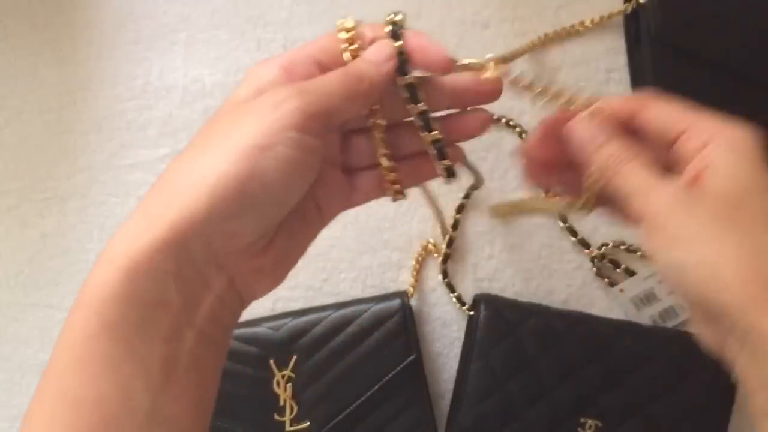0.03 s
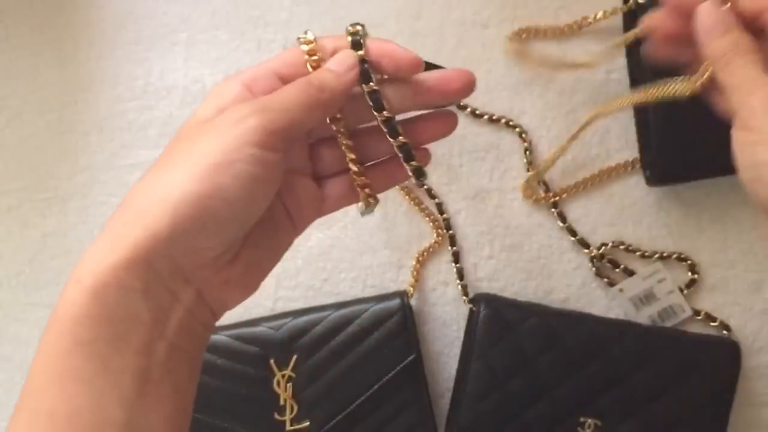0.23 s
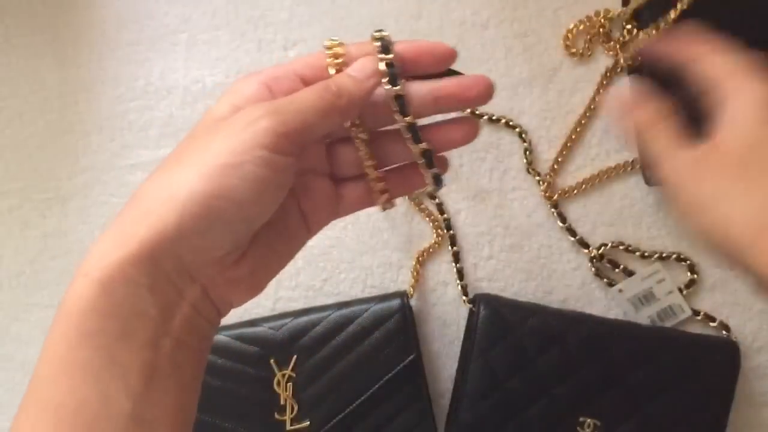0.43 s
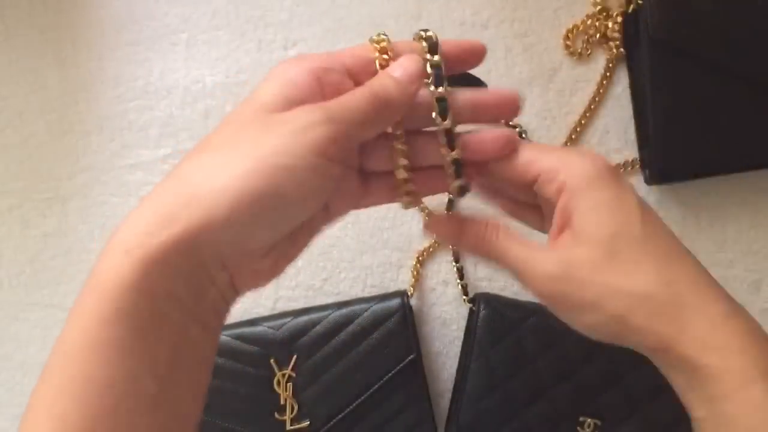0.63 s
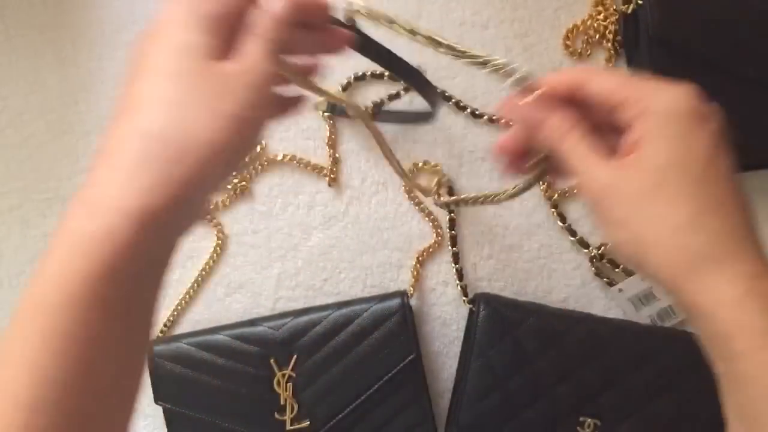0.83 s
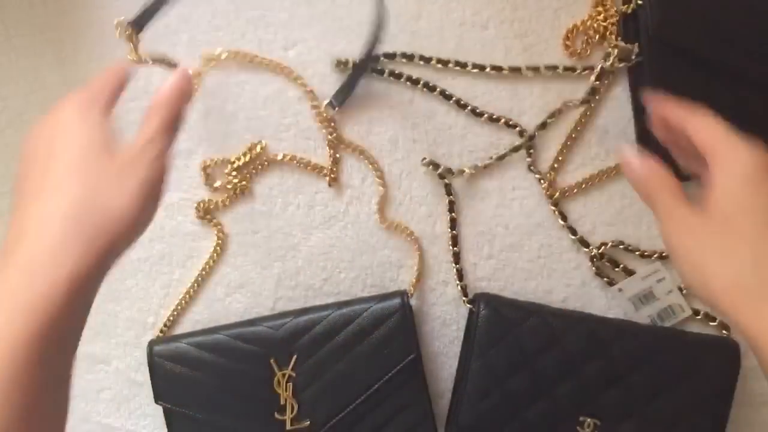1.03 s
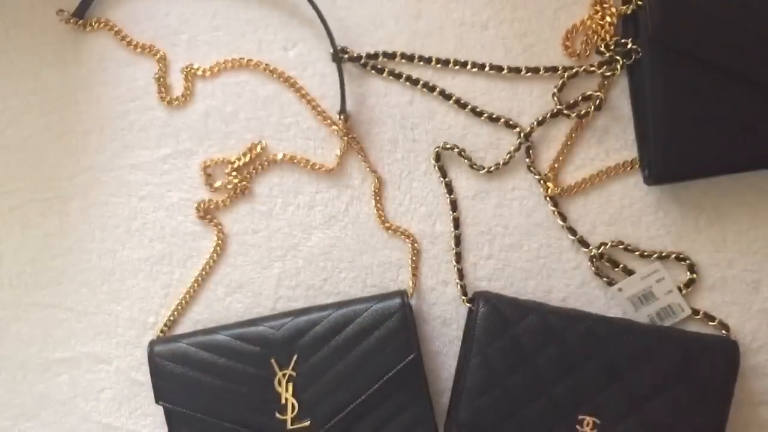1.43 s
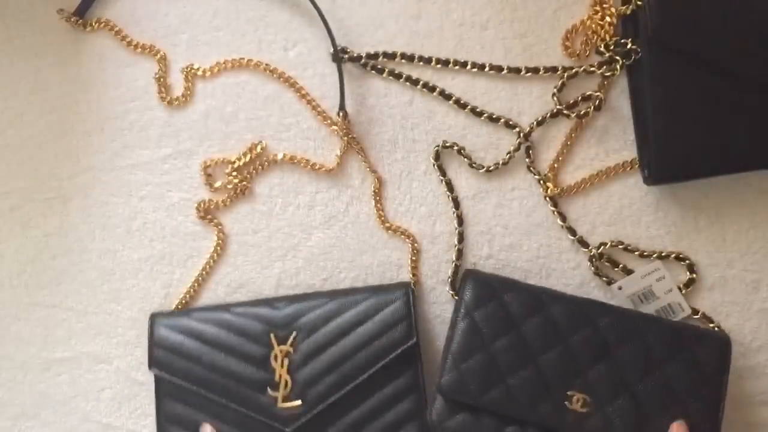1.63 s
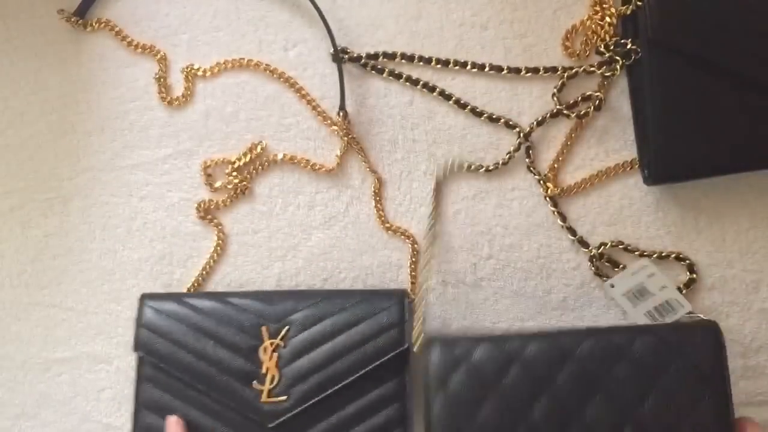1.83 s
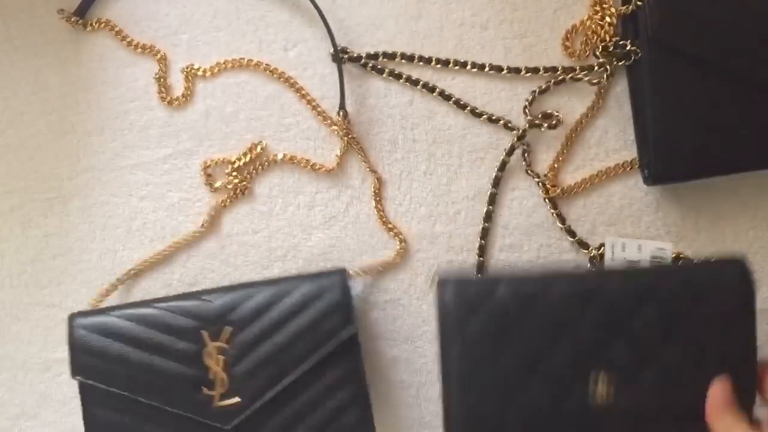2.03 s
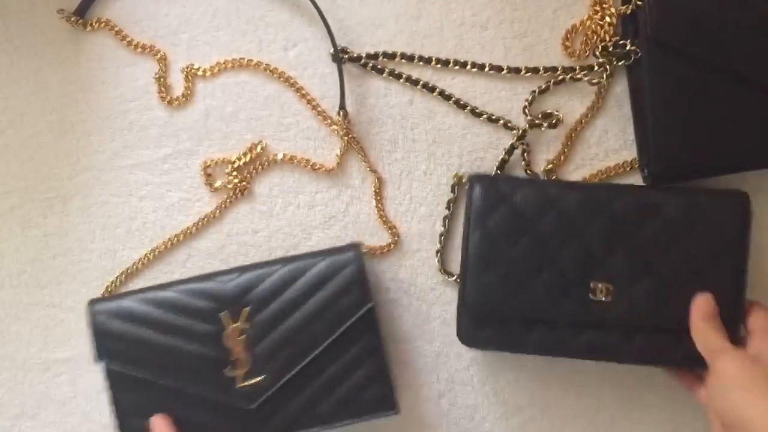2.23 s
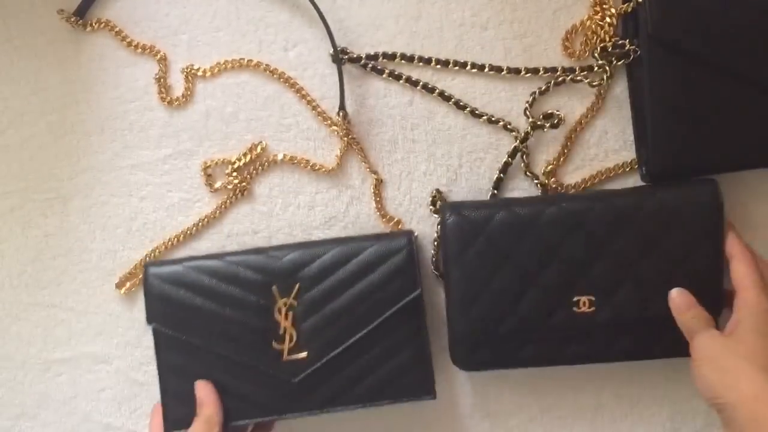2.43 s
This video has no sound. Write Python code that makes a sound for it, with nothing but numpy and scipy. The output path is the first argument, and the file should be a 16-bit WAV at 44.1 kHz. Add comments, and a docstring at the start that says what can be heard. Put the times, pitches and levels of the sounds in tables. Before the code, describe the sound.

Handbag chains jingling and rattling down, followed by soft taps of bags being moved.

```python
"""Handbag chains on a table

In a small, quiet room a chain strap jingles as its colliding links ring, clatters onto a stiff leather bag and
settles. Other straps drop on the cloth-covered table: a chain threaded with leather ticks drily without
ringing, and the padded top thuds. Two bags are shifted: hollow taps, clicking clasps, the stick-slip scrape and
creak of leather, and one more jingle."""
import sys
import numpy as np
from scipy import signal
from scipy.fft import rfft, irfft
from scipy.io import wavfile
from scipy.ndimage import map_coordinates

SR = 44100
rng = np.random.default_rng(int(sys.argv[2]) if len(sys.argv) > 2 else 0)


def dump(signal):
    """Clip the signal to [-1, 1] and save it as 16-bit WAV at the path in sys.argv[1]."""
    limited = np.clip(np.atleast_2d(signal).T, -1, 1)
    pcm = np.round(limited * 32767).astype(np.int16)
    wavfile.write(sys.argv[1], SR, pcm)


N = 114660
THUD_SAG = 0.12  # share of its pitch a thud or tap loses as the weight settles


def jingle(count=20):
    """Modal ringing: links collide in clumps and flurries, each sounding its own pair of modes."""
    # One list for each shake of the chain. Each row: time in seconds, level of motion in dB.
    shakes = [
        [(0.0, -67), (0.03, -81)],
        [(0.138, -83), (0.152, -60), (0.205, -48.5), (0.28, -57), (0.338, -71), (0.376, -55.5), (0.392, -42.5),
         (0.515, -41), (0.555, -52.5), (0.592, -62), (0.635, -46), (0.685, -50.5), (0.718, -59), (0.795, -42.5),
         (0.815, -56), (0.885, -70)],
        [(2.315, -63), (2.33, -46), (2.365, -63.5), (2.44, -80)],
    ]
    # The swinging chain flicks against itself. Each row: start in seconds, level of motion in dB.
    flicks = [(0.232, -40.5), (.306, -55.5), (.45, -41), (.478, -30.5), (0.512, -29), (.615, -42.5),
              (.739, -46), (.772, -42), (.788, -36.5)]
    # Modes of one link. Each row: frequency in Hz, gain in dB, decay time T60 in seconds.
    link_modes = [(8314, -7.5, 0.054), (10864, -5, 0.043)]
    # Spectrum of link striking link. Each row: frequency in Hz, gain in dB.
    contact_spectrum = [(300, -57), (2500, -20.5), (5000, -11), (7000, -23.5), (8400, 1.5), (10000, -4),
                        (11400, 1), (15000, 0)]
    clumps_per_s, clump_db, pitch_scatter = 160, 1.5, 0.0092
    reference = amp(-54.5)  # typical strength of motion
    time = since(0)
    shaking = [amp(np.interp(time, *np.transpose(shake), left=-120, right=-120)) for shake in shakes]
    clumps = amp(clump_db * map_coordinates(rng.standard_normal(N), [time * clumps_per_s]))
    flurries = strokes([(s, 0.0022, db) for s, db in flicks], attack_s=0.0011, release_s=0.046)
    motion = np.hypot(np.max(shaking, axis=0) * clumps, flurries) / reference
    ring_drive = reference * motion ** 0.92
    tick_drive = amp(-3.5) * reference * motion ** 0.89
    ticks = through(contacts(rate=2400, spread_db=-0.5), body(contact_spectrum))
    ticks += amp(-2.5) * pings(1, contact_spectrum, rate=45)
    out = tick_drive * ticks
    for detune in np.linspace(-1, 1, count):
        hits = ring_drive * contacts(rate=49, spread_db=0) / np.sqrt(count)
        for hz, db, t60 in link_modes:
            pitch = hz * (1 + pitch_scatter * (detune + 0.5 * rng.standard_normal()))
            out += amp(db) * resonate(hits, pitch, t60, samples=SR // 4)
    return out


def rattle():
    """Contact damping: leather threaded through the links cuts their ring to dry ticks, with snaps where the
    chain lands."""
    # Straps slide and pile up. Each row: start in seconds, length in seconds, level in dB.
    slides = [(.874, 0.015, -58.5), (.935, 0.019, -68), (1.037, 0.05, -53.5), (1.126, 0.017, -45),
              (1.155, 0.032, -51), (1.186, 0.032, -49), (1.22, 0.05, -60), (1.28, 0.067, -68.5),
              (1.342, 0.016, -56.5), (2.012, 0.088, -76), (2.478, 0.018, -67)]
    # Sharp snaps of links. Each row: start in seconds, level in dB, tilt in dB per octave.
    landings = [(1.0213, -57, -6.5), (1.037, -44.5, -3), (1.0443, -39.5, -4.5), (1.0475, -53, -10),
                (1.06, -43, -8), (1.076, -41.5, 0.5), (1.089, -50, -7), (1.1014, -35.5, 1.5),
                (1.124, -36.5, 3.5), (1.138, -39, 3), (1.1865, -31, 6), (1.2, -34, 5), (1.213, -49, -7),
                (1.353, -46, -4), (2.029, -53, 0), (2.065, -54.5, -1)]
    # Spectrum of damped links. Each row: frequency in Hz, gain in dB.
    spectrum = [(600, -35), (1700, -6.5), (3500, -10), (5500, -8), (8200, 0), (10000, -1.5), (13000, 2.5),
                (15000, 1.5)]
    motion = strokes(slides, attack_s=0.0014, release_s=0.15)
    snaps = sum(through(blow(s, db, t60=0.018, crack=0.13, attack_s=0.00026), body(spectrum, tilt))
                for s, db, tilt in landings)
    ticks = through(amp(-1) * motion * contacts(rate=2200, spread_db=4.5), body(spectrum))
    return snaps + ticks + amp(-7) * pings(motion, spectrum, rate=85)


def pings(motion, spectrum, rate, count=24):
    """Heavily damped resonance: each struck link rings for an instant at its own pitch."""
    out = np.zeros(N)
    for hz in np.linspace(3460, 15550, count):
        pitch = hz * (1 + 0.023 * rng.standard_normal())
        hits = motion * contacts(rate=rate, spread_db=2) / np.sqrt(count)
        out += amp(along(spectrum, hz)) * resonate(hits, pitch, t60=0.005, samples=SR // 20)
    return out


def leather_clacks():
    """Impact excitation: the chain strikes the stiff bag and sounds its broad resonances."""
    # Blows of the chain. Each row: start in seconds, level in dB, tilt in dB per octave.
    strikes = [(0.3602, -34, -9.5), (0.3775, -40.5, -7), (0.3874, -32, -7), (.427, -34, -4),
               (.434, -37.5, -2), (0.448, -33, 0.5), (.458, -31, 1), (0.467, -31, 5.5), (.479, -31.5, 1),
               (0.504, -23, -2), (0.5139, -24, 6.5), (.587, -36.5, 2.5), (.759, -43, -5.5), (.769, -46, -6)]
    # Response of the struck leather. Each row: frequency in Hz, gain in dB.
    spectrum = [(60, -24), (330, 3.5), (650, -5), (1100, -1.5), (1700, 4.8), (2600, -7), (3600, -3),
                (6000, -16.5), (15000, -21)]
    return sum(through(blow(s, db, t60=0.032, crack=0.27, attack_s=0.0004), body(spectrum, tilt))
               for s, db, tilt in strikes)


def leather_friction():
    """Stick-slip friction: leather rasps when something slides over it and creaks as it bends."""
    # Slides, then flexes. Each row: start in seconds, length in seconds, level in dB.
    scrapes = [(.195, 0.03, -63.5), (.396, 0.056, -50), (.43, 0.065, -45), (.54, 0.097, -60),
               (.61, 0.12, -66.5), (.775, 0.015, -61), (1.141, 0.01, -46), (1.165, 0.033, -65.5),
               (1.238, 0.011, -57), (1.67, 0.13, -70), (1.774, 0.028, -60.5), (2.314, .032, -52.5),
               (2.37, 0.03, -58.5), (2.482, 0.023, -54.5)]
    creaks = [(1.657, 0.0054, -48), (2.267, 0.012, -47.5)]
    # Spectra of rubbed and of flexed leather. Each row: frequency in Hz, gain in dB.
    scrape_spectrum = [(100, -6.5), (350, 1.5), (600, 3.5), (1100, 4.5), (1450, -1.5), (2000, 2),
                       (2700, -4.5), (4000, -7), (6500, -20), (15000, -60)]
    creak_spectrum = [(300, -12), (800, 0.5), (1300, 5), (1950, -1.5), (2500, -11), (3200, -13),
                      (4000, -35), (12000, -43)]
    rasp = strokes(scrapes, attack_s=0.0019, release_s=0.098) * contacts(rate=1100, spread_db=1)
    slips = strokes(creaks, attack_s=0.0056, release_s=0.035) * contacts(rate=650, spread_db=0)
    return through(rasp, body(scrape_spectrum)) + through(slips, body(creak_spectrum))


def padded_table():
    """Cushioned impact excites low modes: tumbling chain rumbles and heavier landings thud."""
    # Chains tumble. Each row: start in seconds, length in seconds, level in dB.
    tumbles = [(.155, 0.074, -60.5), (.38, 0.15, -48), (.595, 0.09, -50), (.69, 0.083, -59),
               (1.045, 0.072, -54.5), (1.13, 0.089, -41), (1.24, 0.015, -43.5), (1.52, 0.021, -53.5),
               (1.75, 0.068, -59), (1.935, 0.037, -58), (2.32, 0.028, -54), (2.44, .05, -56)]
    # Response of the padded top. Each row: frequency in Hz, gain in dB.
    spectrum = [(25, -20.5), (55, -2), (100, 3), (190, -3), (260, -11.5), (340, -5), (480, -19), (900, -23),
                (3000, -53)]
    # Strap ends and bags land. Each row: start in seconds, level in dB, pitch in Hz, T60 in seconds.
    landings = [(.238, -44.5, 264, 0.064), (0.504, -29, 250, 0.037), (0.787, -41, 150, 0.084),
                (1.043, -41.5, 237, 0.083), (1.143, -40.5, 350, 0.054), (1.179, -36, 112, 0.03),
                (1.251, -27.5, 183.5, 0.086), (1.26, -29, 89, 0.07), (1.509, -42, 183, 0.08),
                (1.541, -37.5, 237, 0.024), (1.936, -35.5, 161, 0.028), (2.319, -28, 189, 0.04),
                (2.562, -48, 239, 0.21)]
    force = strokes(tumbles, attack_s=0.00077, release_s=0.067) * contacts(rate=900, spread_db=3)
    thuds = sum(amp(db) * mode(s, hz, attack_s=0.0025, t60=t60, sag=THUD_SAG)
                for s, db, hz, t60 in landings)
    return through(force, body(spectrum)) + thuds


def bag_taps():
    """Hollow-body resonance: each tap clicks the flap and sounds one damped mode of the bag."""
    # Each row: start in seconds, relative level in dB, pitch in Hz, offset of the flap's click in dB.
    taps = [(1.509, -32, 421, -10), (1.691, -41, 445, -18), (1.743, -45, 327, -5.5),
            (1.784, -39.5, 373, -6.5), (1.863, -41.5, 486, -11), (1.934, -38, 397, -3.5),
            (2.318, -41.5, 408, 2.5), (2.561, -40, 337, -23.5)]
    # Response of the flap. Each row: frequency in Hz, gain in dB.
    flap_spectrum = [(300, -12.5), (750, -6), (1300, -3), (1750, -23.5), (2300, -16.5), (4000, -30.5),
                     (12000, -46)]
    hollow = sum(amp(db) * mode(s, hz, attack_s=0.002, t60=0.025, sag=THUD_SAG) for s, db, hz, _ in taps)
    flap = sum(blow(s - 0.002, db + click_db, t60=0.028, crack=0.53, attack_s=0.001215)
               for s, db, _, click_db in taps)
    return amp(5) * hollow + amp(-2.5) * through(flap, body(flap_spectrum))


def clasps():
    """Hard contact is broadband: each clasp gives a dry click and rings briefly at its own pitch."""
    # Clasps and rings click. Each row: start in seconds, relative level in dB, pitch in Hz.
    clicks = [(.876, -56.5, 4160), (1.145, -45.5, 2100), (1.152, -46, 2320), (1.541, -59, 2330),
              (1.6479, -48, 5000), (1.659, -55, 4020), (1.666, -49, 2730), (1.789, -54.5, 3040),
              (1.892, -57, 2970), (2.0126, -47.5, 3100), (2.2105, -48, 4260), (2.376, -57.5, 5040)]
    # Spectrum of the dry click. Each row: frequency in Hz, gain in dB.
    spectrum = [(400, -5), (1500, -9), (4200, 2.5), (5500, -1.5), (7200, -9), (15000, -24)]
    out = np.zeros(N)
    for s, db, hz in clicks:
        force = blow(s, db, t60=0.022, crack=1.0, attack_s=0.0007)
        out += amp(-1) * through(force, body(spectrum))
        out += amp(-3.5) * resonate(force, hz, t60=0.003, samples=SR // 20)
    return out


def reverberation(x):
    """Wall reflections merge into a short diffuse tail whose treble is absorbed first."""
    # Decay of the room. Each row: frequency in Hz, T60 in seconds.
    decay_times = [(100, 0.3), (1500, .22), (12000, 0.11)]
    hz, t, noise = signal.stft(rng.standard_normal(SR // 2), SR, nperseg=256)
    tail = signal.istft(noise * decay(t, along(decay_times, hz)[:, None]), SR, nperseg=256)[1]
    tail *= rise(np.arange(len(tail)) / SR, 0.00217)
    return through(x, tail / np.linalg.norm(tail))


def room_tone():
    """Ambient noise: a faint, steady rush with most of its energy in the bass."""
    # Spectrum of the quiet room. Each row: frequency in Hz, gain in dB.
    spectrum = [(24, -33), (40, -0.5), (72, 3), (110, -6), (200, -12.5), (800, -26.5), (2000, -26.5),
                (15000, -39)]
    return unit(through(rng.standard_normal(N), body(spectrum)))


def amp(db):
    """Decibels as an amplitude ratio."""
    return 10 ** (np.asarray(db) / 20)


def unit(x):
    """Normalisation to rms 1."""
    return x / np.sqrt(np.mean(x ** 2) + 1e-20)


def along(points, hz):
    """Interpolation of (Hz, value) points on a logarithmic frequency axis."""
    frequencies, values = np.transpose(points)
    return np.interp(np.log(hz + 1), np.log(frequencies + 1), values)


def since(s):
    """Seconds since time s, zero before it."""
    return np.maximum(np.arange(N) / SR - s, 0)


def rise(t, attack_s):
    """Exponential approach from 0 to 1."""
    return 1 - np.exp(-t / attack_s)


def decay(t, t60):
    """Exponential decay by 60 dB in t60 seconds."""
    return np.exp(-np.log(1000) * t / t60)


def body(spectrum, tilt_db=0, size=4096):
    """Minimum-phase impulse response of energy 1, its treble tilted by tilt_db per octave."""
    hz = np.fft.rfftfreq(size, 1 / SR)
    gain = amp(along(spectrum, hz) + tilt_db * np.log2(1 + hz / 1000))
    cepstrum = irfft(np.log(gain))
    cepstrum[1:size // 2] *= 2  # folding onto positive time makes the response causal
    cepstrum[size // 2 + 1:] = 0
    response = irfft(np.exp(rfft(cepstrum)))
    return response / np.linalg.norm(response)


def through(x, response):
    """Linear filtering: convolution with an impulse response."""
    return signal.fftconvolve(x, response)[:N]


def contacts(rate, spread_db):
    """Shot noise of rms 1: tiny impacts of random size, on average rate per second."""
    size = amp(spread_db * np.clip(rng.standard_normal(N), -2, 2)) * rng.choice([-1, 1], N)
    return unit(size * (rng.random(N) < rate / SR))


def strokes(rows, attack_s, release_s):
    """Incoherent addition: envelopes that rise, hold and decay are summed in power."""
    envelopes = (amp(db) * rise(since(s), attack_s) * decay(since(s + length), release_s)
                 for s, length, db in rows)
    return np.sqrt(sum(envelope ** 2 for envelope in envelopes))


def blow(s, db, t60, crack, attack_s):
    """Impact force: a contact builds up, cracks in one impulse at its peak and chatters away."""
    fade = rise(since(s), attack_s) ** 2 * decay(since(s), t60)
    fade /= fade.max()
    force = fade * rng.standard_normal(N)
    force[np.argmax(fade)] += crack * np.linalg.norm(fade)
    return amp(db - 3.5) * force * np.linalg.norm(fade) / np.linalg.norm(force)


def mode(s, hz, attack_s, t60, sag=0, settle_s=0.019):
    """Free vibration: one damped sinusoid with a smooth onset; its pitch may sag."""
    t = since(s)
    cycles = hz * (t - sag * (t - settle_s * rise(t, settle_s)))
    onset = 1 - np.exp(-(t / attack_s) ** 2)
    return np.sin(2 * np.pi * cycles) * onset * decay(t, t60)


def resonate(force, hz, t60, samples):
    """Forced vibration: a force drives one mode whose impulse response has energy 1."""
    ring = mode(0, hz, attack_s=0.0001, t60=t60)[:samples]
    return through(force, ring / np.linalg.norm(ring))


def scene():
    """Superposition: the direct sound of chains and bags, its weak reverberation and the room tone."""
    direct = jingle() + rattle() + leather_clacks() + leather_friction()
    direct += padded_table() + bag_taps() + clasps()
    background = amp(-63) * room_tone()
    return (direct + amp(-12.5) * reverberation(direct) + background)[None]


def record(dry):
    """Band limiting: a low-pass filter removes the highest treble."""
    cutoff_hz = 15500
    return signal.fftconvolve(dry, signal.firwin(401, cutoff_hz, fs=SR)[None], mode="same", axes=1)


dry = scene()
out = record(dry)
dump(out)
```